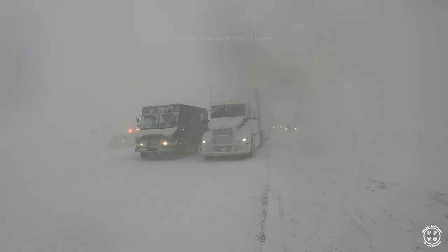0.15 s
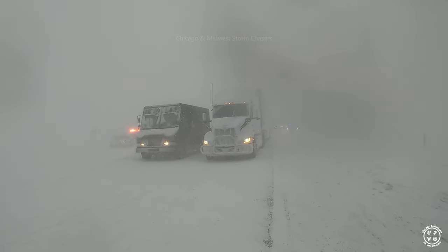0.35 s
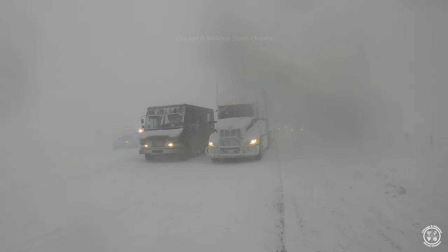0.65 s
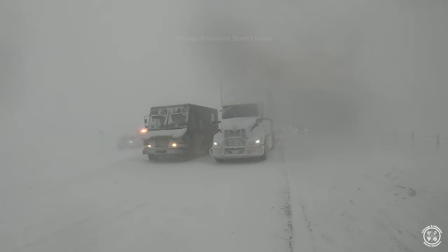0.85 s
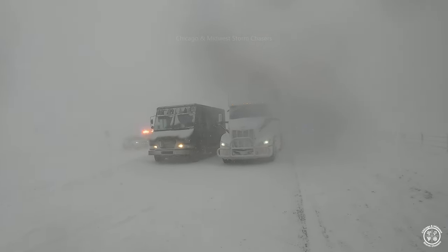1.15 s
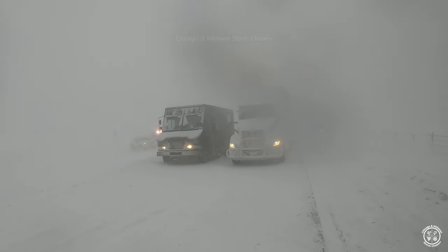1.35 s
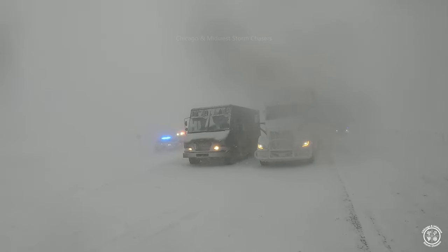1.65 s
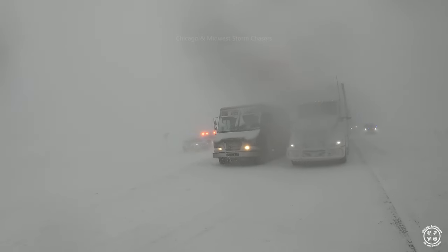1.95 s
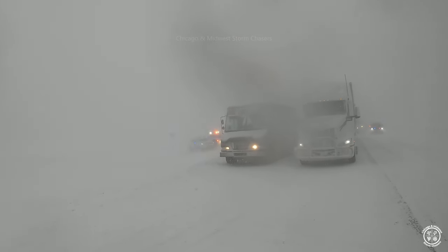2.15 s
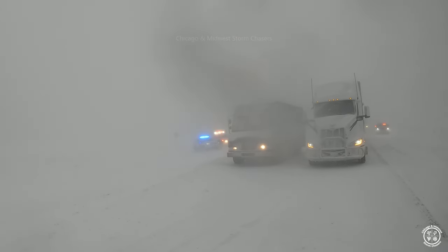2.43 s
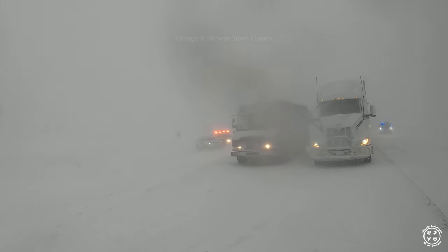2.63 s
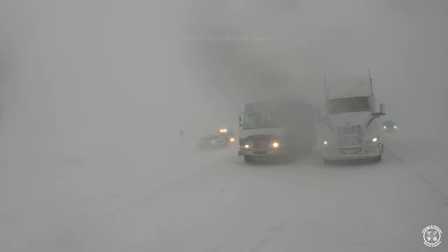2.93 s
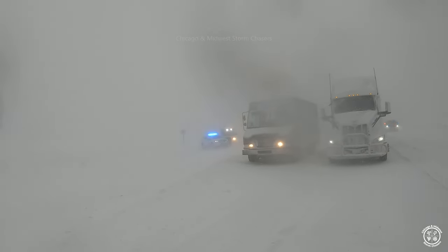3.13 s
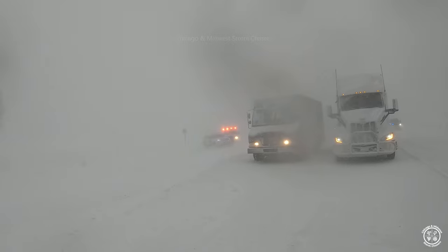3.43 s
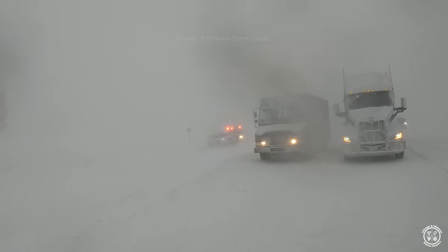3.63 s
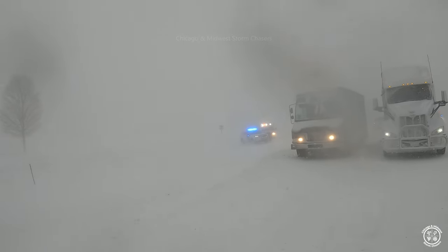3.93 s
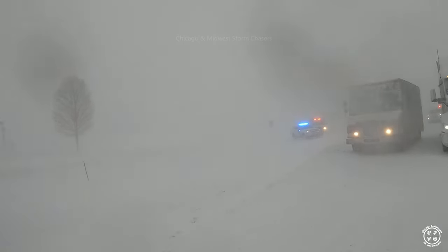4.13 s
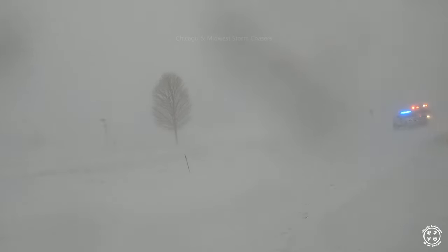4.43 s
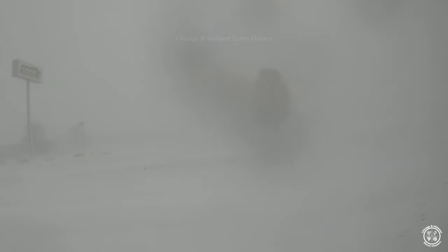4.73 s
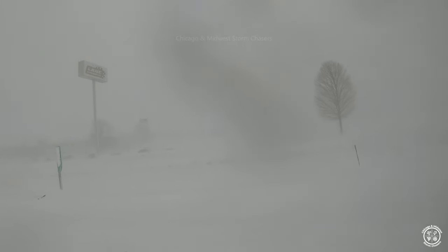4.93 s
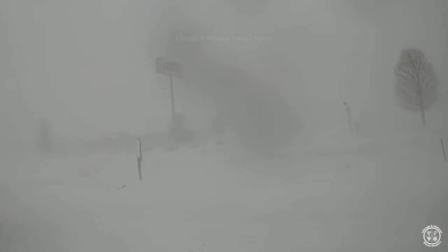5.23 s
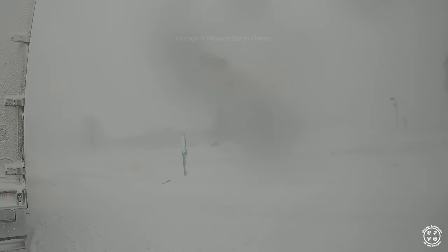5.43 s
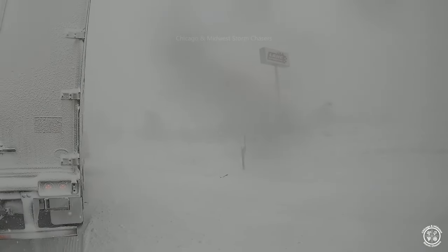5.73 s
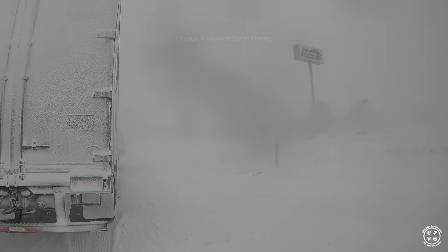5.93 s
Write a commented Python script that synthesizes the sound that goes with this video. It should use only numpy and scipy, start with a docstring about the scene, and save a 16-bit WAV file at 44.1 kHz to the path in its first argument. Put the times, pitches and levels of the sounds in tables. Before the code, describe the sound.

Strong blizzard wind buffets the microphone with a steady low rumble, irregular gusty blasts and a faint hiss of blowing snow.

```python
"""Blizzard wind buffets one exposed microphone on an open road.
Turbulent pressure acts on it directly: large eddies rock and slap the diaphragm, while small ones
flutter across the port and separate at its edge in short, bright blasts and hoarse whistles.
Behind them the storm rushes and howls, driven snow hisses, and ice grains and snow crystals
excite the modes of the housing by impact. A limiter holds the peaks."""
import sys
import numpy as np
from scipy import signal
from scipy.fft import rfft, irfft, next_fast_len
from scipy.io import wavfile
from scipy.ndimage import uniform_filter1d, minimum_filter1d, map_coordinates

SR = 44100
rng = np.random.default_rng(int(sys.argv[2]) if len(sys.argv) > 2 else 0)


def file_out(sig):
    """Save sig as 16-bit WAV at sys.argv[1]."""
    # one column per channel
    cols = np.atleast_2d(sig).T
    # limit, then scale
    lim = np.clip(cols, -1, 1)
    pcm = np.round(lim * 32767).astype(np.int16)
    wavfile.write(sys.argv[1], SR, pcm)


N = 268083

# Pressure of the large eddies. Each row: time in seconds, level in dB.
BUFFET_LEVEL = [(0, -18), (.9, -17.5), (1.6, -17.5), (1.95, -20), (2.07, -17.5), (2.35, -19), (3.2, -19),
                (3.85, -19), (4.6, -20.5), (4.8, -18), (5.05, -21.5), (5.6, -18), (6.08, -19)]
# Lulls between large eddies. Each row: centre in seconds, depth in dB, half length in seconds.
LULLS = [(0.166, 1.5, 0.033), (0.558, 5, .025), (0.757, 2, 0.022), (1.19, 3, .02), (2.161, 8, 0.015),
         (2.315, 2.5, .02), (3.435, 5.5, 0.022), (3.707, 5, 0.02), (3.91, 2, 0.019), (4.173, 3, 0.02),
         (4.33, 4.5, .025), (4.58, 2, 0.018), (4.71, 3.5, .018), (4.978, 6, 0.018), (5.353, 3, .02),
         (6.039, 4, 0.011)]
# Flow across the port. Each row: time in seconds, level in dB.
FLOW_LEVEL = [(0, -20.5), (.3, -38), (.8, -37.5), (.93, -27), (1.33, -27), (1.47, -31), (1.62, -26),
              (2.17, -24), (2.33, -28.5), (2.6, -30), (2.78, -23.5), (3.45, -24.5), (3.8, -23.5),
              (4.15, -37.5), (4.65, -29), (5.05, -37), (5.3, -29), (5.82, -30.5), (5.97, -27.5),
              (6.03, -36.5)]
# Eddy size, set by the microphone's angle to the wind. Each row: time in seconds, base corner in Hz.
EDDY_CORNER = [(0, 478), (3.15, 447), (3.65, 301), (5.3, 362), (5.7, 470)]
# Blasts at the port. Each row: centre in seconds, level in dB, half length in seconds, corner in Hz.
BLASTS = [(0.023, -29, 0.046, 885), (0.06, -23.5, 0.015, 510), (0.092, -31, 0.0045, 950),
          (0.164, -33, 0.011, 950), (0.231, -33, 0.016, 450), (0.346, -33, .003, 1000),
          (0.415, -16.5, 0.0047, 360), (0.426, -23, 0.017, 630), (0.479, -22.5, 0.016, 495),
          (0.496, -23.5, 0.015, 426), (0.515, -49, 0.058, 2800), (0.627, -29, 0.011, 295),
          (.668, -30.5, 0.0057, 550), (.702, -26.5, 0.0045, 394), (.932, -24.5, 0.012, 300),
          (0.984, -28, 0.0053, 560), (1.024, -26.5, 0.012, 605), (1.096, -29, 0.01, 620),
          (1.136, -35.5, 0.02, 990), (1.264, -28, 0.011, 520), (1.305, -26, 0.0044, 450),
          (1.332, -27, 0.0082, 450), (1.583, -20, 0.0053, 520), (1.605, -23, 0.0064, 480),
          (1.615, -19.5, 0.0023, 500), (1.653, -29, 0.0066, 810), (1.693, -24.5, 0.014, 760),
          (1.73, -24.5, 0.0047, 764), (1.761, -25.5, 0.0048, 453), (1.836, -34, .004, 560),
          (1.94, -27, 0.022, 380), (1.985, -29, .018, 470), (2.043, -22.5, 0.0064, 330),
          (2.074, -25.5, 0.016, 740), (2.075, -35.5, 0.0099, 1500), (2.1, -23, 0.02, 484),
          (2.14, -25.5, .02, 420), (2.218, -23, .018, 305), (2.257, -29, 0.0045, 850),
          (2.303, -38, .006, 1400), (2.473, -28, 0.049, 225), (2.643, -30, 0.0033, 620),
          (2.71, -27, 0.0088, 447), (2.748, -25.5, 0.01, 473), (2.838, -26, 0.056, 348),
          (2.916, -43.5, 0.055, 1600), (2.966, -28.5, .012, 378), (3.126, -26, .012, 420),
          (3.13, -27.5, 0.097, 390), (3.354, -29, 0.018, 595), (3.546, -36, 0.031, 1240),
          (3.591, -18.5, 0.012, 190), (3.984, -38.5, 0.0064, 1900), (4.055, -43, 0.027, 1400),
          (4.271, -25.5, 0.014, 202), (4.391, -23.5, .014, 168), (4.406, -50, .014, 4000),
          (4.548, -26.5, 0.0073, 750), (4.761, -44, 0.016, 1900), (4.81, -21, 0.012, 302),
          (4.916, -22.5, 0.012, 252), (5.227, -37.5, 0.026, 1650), (5.428, -18, 0.025, 273),
          (5.46, -39.5, 0.014, 1700), (5.651, -34, 0.0052, 1350), (5.713, -25, 0.026, 320),
          (5.765, -34, 0.0045, 1150), (5.855, -16.5, 0.0077, 262), (5.87, -18, 0.0077, 524)]
# Eddies that slap the diaphragm. Each row: start in seconds, envelope peak in dB, pitch in Hz.
SLAPS = [(.069, -15, 546), (1.577, -16, 202), (2.1, -16, 300), (4.812, -13, 322), (5.69, -16.5, 262),
         (5.732, -19.5, 278), (5.852, -8, 257), (5.89, -13.5, 383), (5.904, -19, 436)]
# Edge tones. Each row: centre in seconds, level in dB, half length in seconds, pitch in Hz,
# half bandwidth as a share of the pitch.
WHISTLES = [(3.982, -31, 0.0076, 766, 0.15), (4.633, -36, 0.019, 1710, 0.13), (5.871, -31, 0.013, 900, 0.3)]
# Strength of the storm over the road. Each row: time in seconds, level in dB.
STORM_LEVEL = [(0, -46), (.53, -38), (.8, -42.5), (1.18, -40), (1.45, -42.5), (1.65, -39.5), (1.85, -42.5),
               (3.3, -45), (3.52, -39.5), (3.72, -43.5), (4.4, -36.5), (5.0, -37.5), (5.2, -35), (5.5, -37),
               (6.08, -40)]
# Amount of snow in the air. Each row: time in seconds, level of its hiss in dB.
DRIFT_LEVEL = [(0, -58), (.5, -60.5), (1.2, -59.5), (1.65, -59), (1.8, -62), (2.2, -59.5), (2.6, -58),
               (3.5, -57.5), (3.7, -60), (3.95, -59.5), (4.35, -57), (4.65, -55), (5.05, -56),
               (5.75, -59.5), (5.9, -61.5)]
# Howling gusts. Each row: centre in seconds, level in dB, half length in seconds, raggedness in dB.
HOWLS = [(0.118, -36.5, 0.13, 5), (4.607, -31.5, 0.049, 3.5), (4.775, -38.5, 0.027, 2.5),
         (4.79, -36, 0.15, 3), (5.254, -44, 0.047, 6)]
# Ice impacts. Each row: start in seconds, relative level in dB, focus in Hz, spread in octaves.
ICE_GRAINS = [(2.1908, -40, 5170, .15), (2.379, -44, 5000, .1), (2.5104, -42, 5000, .1),
              (2.549, -43, 5000, .1), (2.6095, -48, 6200, .4), (2.6409, -45, 6560, .5),
              (2.7324, -37, 5000, .14), (2.7538, -35, 5000, 0.79), (2.7648, -37, 8000, .4),
              (2.7734, -41, 4900, .16), (4.791, -41, 9000, .35)]
# Modes of the housing. Each row: frequency in Hz, relative level in dB, seconds to decay by 60 dB.
HOUSING_MODES = [(3500, -8, .012), (4640, -0.5, 0.015), (4990, -1, .022), (5870, -4.5, .012),
                 (6540, -10, 0.022), (9300, -10, .013)]
# Noise spectra of the sources. Each row: frequency in Hz, relative spectral density in dB.
LARGE_EDDY_SPECTRUM = [(8, -9.5), (22, 1), (45, -1.5), (80, -3.5), (120, -5.5), (170, -15), (300, -25.5),
                       (700, -62.5), (2000, -92.5), (9000, -130)]
SMALL_EDDY_SPECTRUM = [(50, -30.5), (120, -4.5), (190, 3.5), (320, -3.5), (550, -8), (1200, -11.5),
                       (3300, -10), (6000, -30.5), (12000, -72)]
AIR_SPECTRUM = [(100, -0.5), (350, 6), (600, 6.5), (1100, 3), (1500, -2.5), (1850, -4.5), (1955, -4),
                (2100, -4), (2450, -7), (2720, -7), (3300, -9.5), (4100, -20.5), (6000, -40), (13000, -78)]
SNOW_SPECTRUM = [(1500, -27), (3200, 6.5), (5000, -0.5), (5500, -1.5), (6600, -4.5), (7400, -10),
                 (9400, -15), (10700, -22.5), (12000, -29.5), (13000, -43), (15700, -68.5)]
HOWL_SPECTRUM = [(250, -32), (550, 5.5), (850, 0.5), (1200, 3.5), (1600, -6.5), (2100, -9.5), (3300, -19.5),
                 (7000, -59.5), (13000, -80.5)]


def buffet():
    """Turbulent pressure: large eddies push the diaphragm to and fro in a low rumble."""
    level_db, = curves(BUFFET_LEVEL)
    return amp(level_db + 0.34 * wobble(9.6)) * steadied(noise(LARGE_EDDY_SPECTRUM), span=0.048)


def lulls():
    """Intermittency: the gain of the wind drops for a moment between eddies."""
    t = np.arange(N) / SR
    return amp(-sum(db * swell(t - centre, half) for centre, db, half in LULLS))


def flutter():
    """Amplitude modulation: small eddies come in puffs on slow surges; harder puffs are brighter."""
    level_db, = curves(FLOW_LEVEL)
    corner_hz, = curves(EDDY_CORNER)
    puff_db, ripple_db = 2 * wobble(65), 1.5 * wobble(190)
    puffs = steadied(amp(puff_db + ripple_db), span=0.062)
    eddies = turbulence(corner_hz * puffs ** 0.35, steepness=2.75)
    surge_db = wobble(11)
    return amp(level_db + surge_db) * puffs * eddies


def turbulence(corner_hz, steepness):
    """Eddy shedding: faster flow sheds smaller eddies, so the noise rolls off above a moving corner."""
    hz, t, spectra = signal.stft(noise(SMALL_EDDY_SPECTRUM), SR, nperseg=256)
    corner = np.interp(t, np.arange(N) / SR, np.maximum(corner_hz, 50))
    rolloff = 1 / np.sqrt(1 + (hz[:, None] / corner) ** (2 * steepness))
    return steadied(signal.istft(spectra * rolloff, SR, nperseg=256)[1][:N], span=0.054)


def blasts():
    """Flow separation: air tears off the edge of the port in short rushes that swell and die."""
    out, t = np.zeros(N + SR), np.arange(SR // 2) / SR - 1 / 4
    for centre, db, half, hz in BLASTS:
        out[round(centre * SR):][:len(t)] += amp(db) * swell(t, half) * rush(hz, rise=0.41, fall=2.65)
    return out[SR // 4:][:N]


def rush(corner_hz, rise, fall):
    """Eddy size sets frequency: half a second of ragged noise in one broad spectral hump."""
    hz = np.fft.rfftfreq(SR // 2, 1 / SR)
    ratio = hz / corner_hz
    hump = ratio ** rise / np.sqrt(1 + ratio ** (2 * (rise + fall))) / (1 + (hz / 6500) ** 6)
    band = steadied(irfft(rfft(rng.standard_normal(SR // 2)) * hump), span=0.017)
    raggedness = steadied(amp(2.8 * wobble(258.35, size=len(band))), span=0.014)
    return band * raggedness


def slaps():
    """Pressure pulses: a single eddy bursts on the diaphragm with a deep push and a quick rebound."""
    out, t = np.zeros(N + SR), np.arange(SR // 10) / SR
    cycles_to_peak = 0.7
    for start, db, hz in SLAPS:
        age = hz * t / cycles_to_peak
        envelope = (age * np.exp(1 - age)) ** 2
        out[round(start * SR):][:len(t)] += amp(db) * envelope * np.sin(2 * np.pi * hz * t)
    return out[:N]


def whistles():
    """Edge tone: for an instant the flow half locks to a pitch, as noise through a steep resonance."""
    out, t = np.zeros(N), np.arange(N) / SR
    for centre, db, half, hz, width in WHISTLES:
        resonance = lambda f: hz * f / (hz * hz - f * f + 2j * width * hz * f)
        response = lambda f: resonance(f) ** 2 / (1 + (f / (1.7 * hz)) ** 4)
        tone = steadied(unit(filtered(rng.standard_normal(N), response)), span=0.0091)
        out += amp(db) * swell(t - centre, half) * tone
    return out


def storm():
    """Broadband flow noise: rushing air carries a hiss of snow, and one gustiness modulates both."""
    air_db, = curves(STORM_LEVEL)
    snow_db, = curves(DRIFT_LEVEL)
    gust_db = 0.5 * wobble(22)
    air = amp(air_db + gust_db) * patchy(noise(AIR_SPECTRUM), depth_db=1.0)
    snow = amp(snow_db + gust_db + 1.7 * wobble(300)) * noise(SNOW_SPECTRUM)
    return air + snow


def howls():
    """Power addition: gusts, smooth or flapping, swell and fade in one broad band of noise."""
    t, flap = np.arange(N) / SR, wobble(110)
    gusts = [amp(db) * swell(t - centre, half) * steadied(amp(ragged_db * flap), span=0.091)
             for centre, db, half, ragged_db in HOWLS]
    return np.linalg.norm(gusts, axis=0) * noise(HOWL_SPECTRUM)


def ice():
    """Modal ringing: a grain scuffs the housing, and where it lands decides which modes answer."""
    out, t, hiss = np.zeros(N + SR), np.arange(SR // 10) / SR, noise(SNOW_SPECTRUM)
    contact = 1 - np.exp(-(t / 0.0005) ** 2)
    for start, db, focus_hz, spread in ICE_GRAINS:
        onset, ring = round(start * SR), np.zeros(len(t))
        for hz, mode_db, t60 in HOUSING_MODES:
            coupling = swell(np.log2(hz / focus_hz), spread)
            decay = amp(mode_db + rng.normal(0, 2.2) - 60 * t / t60)
            ring += coupling * decay * np.sin(2 * np.pi * (hz * t + rng.random()))
        scuff = 0.82 * spread * amp(-60 * t / 0.022) * hiss[onset:][:len(t)]
        out[onset:][:len(t)] += amp(db - 6.5) * contact * (ring + scuff)
    return out[:N]


def sleet():
    """Shot noise: tiny snow crystals ring the housing faintly and briefly, louder in thick drift."""
    drift_db, = curves(DRIFT_LEVEL)
    level_db = -72.5 + 1.8 * (drift_db - drift_db.mean())
    strikes = (rng.random(N) < 400 / SR) * rng.standard_normal(N)  # about 400 a second
    t = np.arange(SR // 50) / SR
    ring = sum(amp(mode_db - 60 * t / (0.36 * t60)) * np.sin(2 * np.pi * hz * t)
               for hz, mode_db, t60 in HOUSING_MODES)
    patter = signal.fftconvolve(strikes, ring)[:N]
    soft_contact = lambda hz: 1 / (1 + (hz / 9600) ** 14)
    return amp(level_db) * unit(filtered(patter, soft_contact))


def amp(db):
    """Amplitude ratio of a level in decibels."""
    return 10 ** (np.asarray(db) / 20)


def unit(x):
    """Normalisation to rms 1."""
    return x / np.sqrt(np.mean(x ** 2) + 1e-20)


def swell(t, half):
    """Gaussian bell around t = 0; half is its standard deviation."""
    return np.exp(-0.5 * (t / half) ** 2)


def curves(rows):
    """Linear interpolation: one value per sample for each column after the time."""
    times, *columns = np.transpose(rows)
    return [np.interp(np.arange(N) / SR, times, column) for column in columns]


def wobble(rate, size=N):
    """Random modulation: a spline through rate random knots a second."""
    knots = rng.standard_normal(int(size * rate / SR) + 4)
    return map_coordinates(knots, [np.arange(size) * rate / SR])


def filtered(x, response):
    """Linear filtering: the spectrum of x times a frequency response."""
    size = next_fast_len(N + SR // 2)
    return irfft(rfft(x, size) * response(np.fft.rfftfreq(size, 1 / SR)), size)[:N]


def noise(spectrum):
    """Spectral shaping: noise of rms 1 that follows (Hz, dB) points on a log frequency axis."""
    points_hz, points_db = np.transpose(spectrum)
    response = lambda hz: amp(np.interp(np.log(hz + 1), np.log(points_hz + 1), points_db))
    return unit(filtered(rng.standard_normal(N), response))


def steadied(x, span):
    """Division by the running rms evens out the level over span seconds."""
    size = max(int(span * SR), 2)
    return x / np.sqrt(np.abs(uniform_filter1d(uniform_filter1d(x * x, size), size)) + 1e-9)


def patchy(x, depth_db):
    """Spectral modulation: louder and softer patches, some 800 Hz wide and 50 ms long."""
    spectra = signal.stft(x, nperseg=512)[2]
    field = rng.standard_normal(spectra.shape)
    patches = uniform_filter1d(uniform_filter1d(field, size=9, axis=0), size=9, axis=1)
    return unit(signal.istft(spectra * amp(depth_db * unit(patches)), nperseg=512)[1][:N])


def scene():
    """Superposition: wind, snow and ice add at one microphone."""
    lull = lulls()
    eddies = lull * buffet() + lull ** 0.54 * flutter()  # small eddies dip about half as many dB
    return (eddies + blasts() + slaps() + whistles() + storm() + howls() + sleet() + ice())[None]


def record(dry):
    """Peak and band limiting: the gain ducks under the strongest pushes, and the top treble is cut."""
    pressure, ceiling, top_hz = dry[0], amp(-6.5), 15700
    needed_gain = np.minimum(1, ceiling / (np.abs(pressure) + 1e-9))
    gain = uniform_filter1d(minimum_filter1d(needed_gain, size=700), size=500)
    soft_ends = signal.windows.tukey(N, 0.001)
    return filtered(pressure * gain * soft_ends, lambda hz: hz < top_hz)[None]


dry = scene()
out = record(dry)
file_out(out)
```